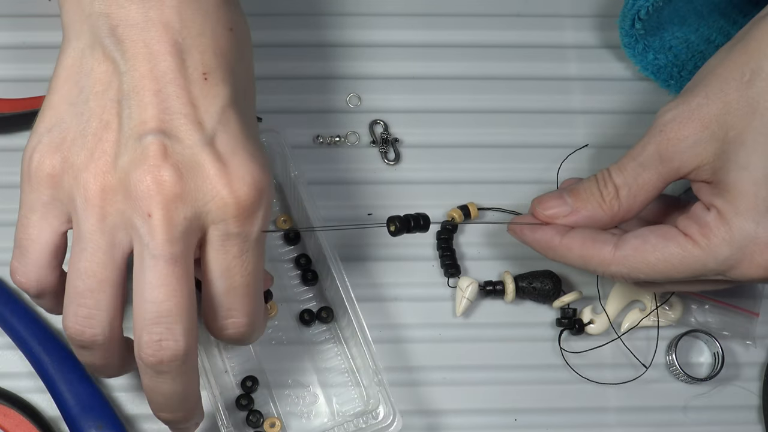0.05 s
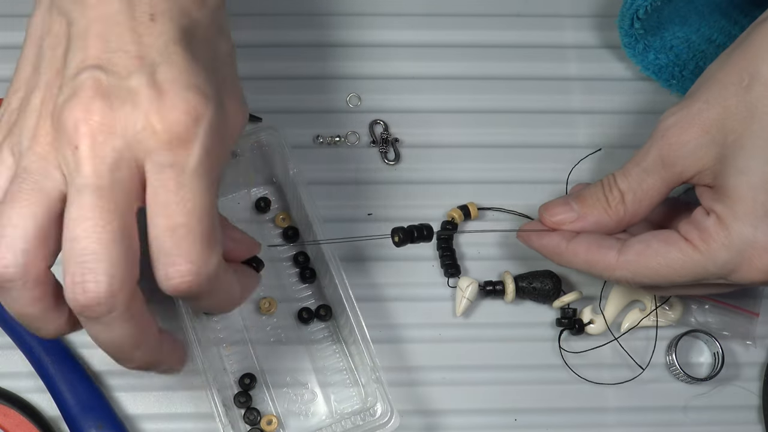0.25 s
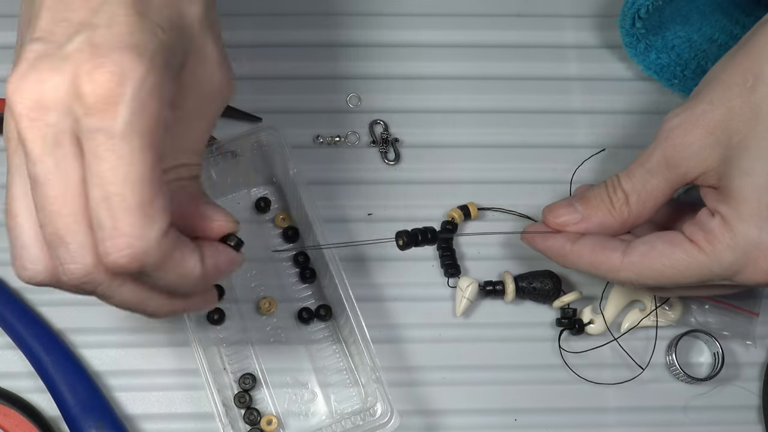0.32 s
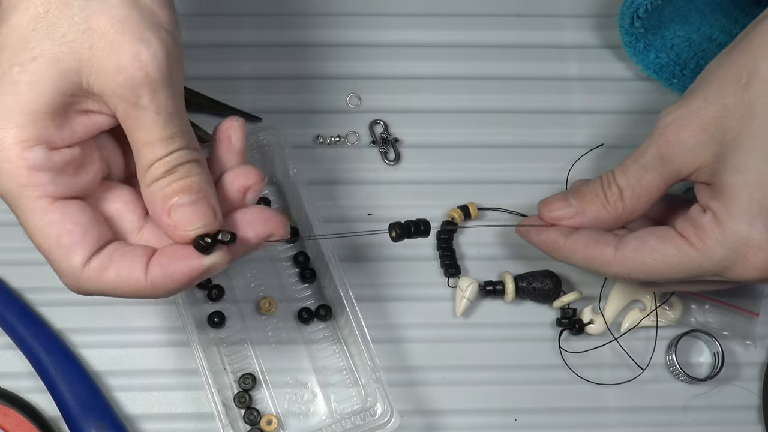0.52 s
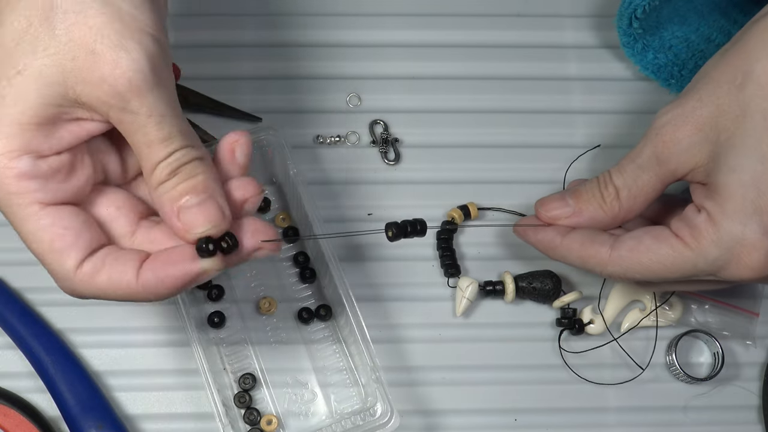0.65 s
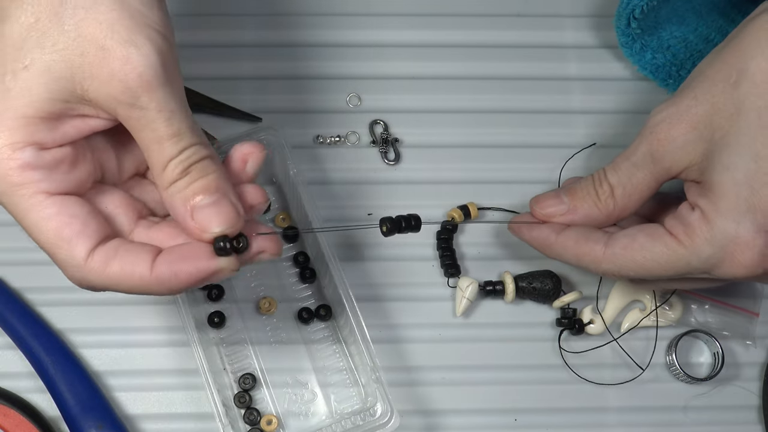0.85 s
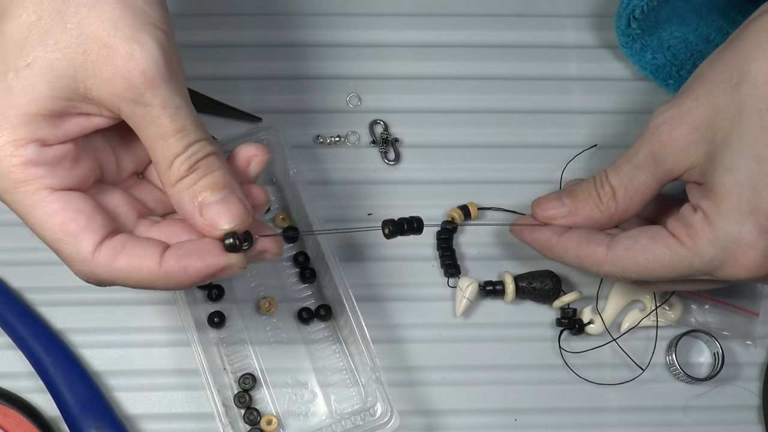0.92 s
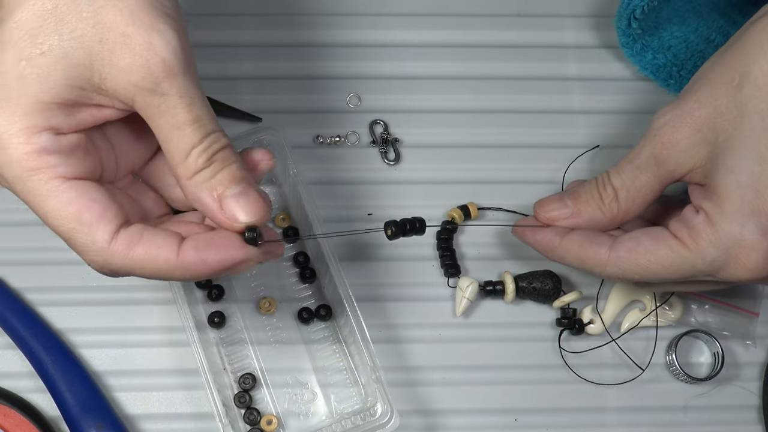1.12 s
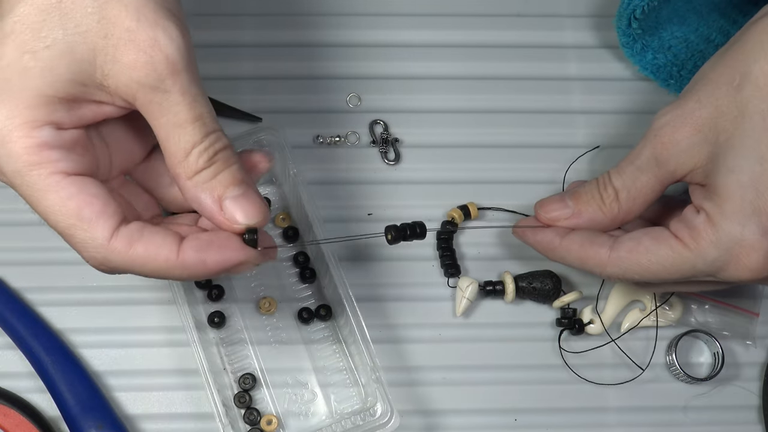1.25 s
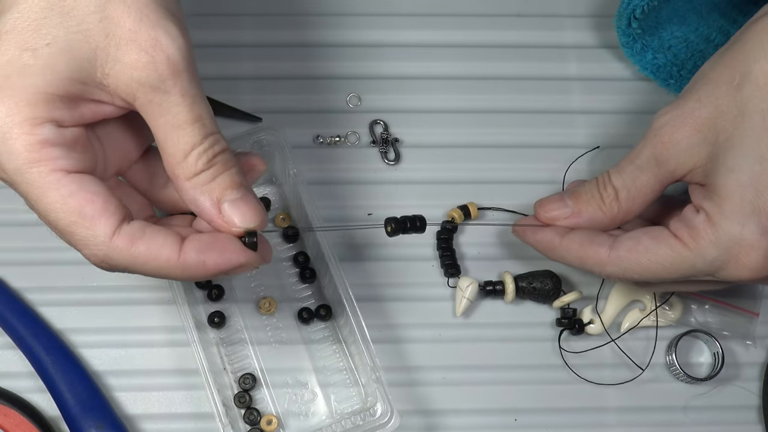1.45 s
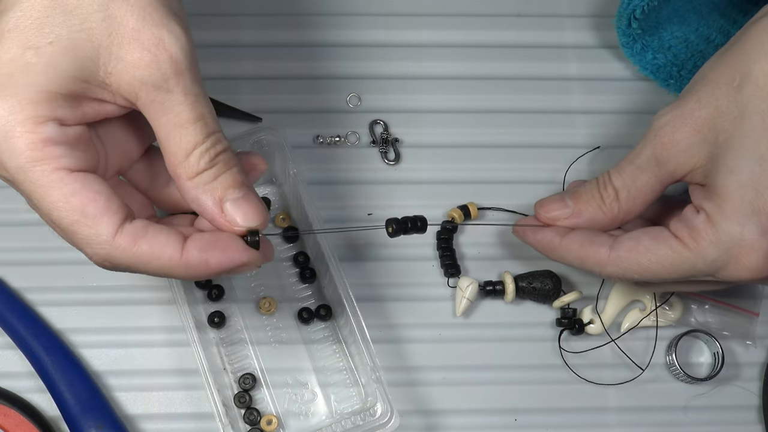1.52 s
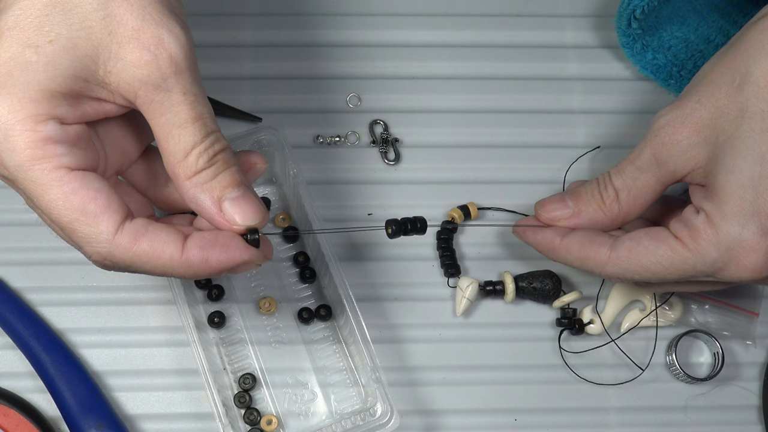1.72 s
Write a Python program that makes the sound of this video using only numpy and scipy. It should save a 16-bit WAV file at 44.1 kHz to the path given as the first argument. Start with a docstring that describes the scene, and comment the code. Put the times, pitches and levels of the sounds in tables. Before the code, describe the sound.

Small beads rattle in a thin plastic tray, one brief clatter, then quiet room air

```python
"""Fingers pick small wooden beads out of a thin plastic tray, close to a pair of microphones.
The tray knocks on the table and chatters with its beads: shaped noise bursts, ringing walls, low modes.
Light bead clicks come before and after as shorter noise bursts, over a crackle of tiny contacts.
Behind lies a small room: a short tail of decaying noise, steady coloured air noise,
and low resonances, wavering sines that swell and fade."""
import sys
import numpy as np
from scipy import signal
from scipy.fft import rfft, irfft, next_fast_len
from scipy.io import wavfile
from scipy.ndimage import map_coordinates

SR = 44100
rng = np.random.default_rng(int(sys.argv[2]) if len(sys.argv) > 2 else 0)


def wrap_up_sound(samples):
    """Save the sound to the file named by the first command line argument, as 16-bit audio."""
    columns = np.atleast_2d(samples).T
    # keep every value between -1 and 1, then stretch to whole-number steps
    tamed = np.clip(columns, -1, 1)
    steps = np.round(tamed * 32767).astype(np.int16)
    wavfile.write(sys.argv[1], SR, steps)


N = 79380  # samples, 1.8 s

# Tray knocking with its beads. Each row: start in seconds, relative level in dB, treble tilt in dB per octave.
TRAY_KNOCKS = [(0.2046, -23.5, 2), (0.2069, -22, -0.5), (.2105, -33, -4), (.2215, -38, 6),
               (0.2244, -31.5, -3.5), (.2316, -28, -1), (0.2343, -25.5, 3.5), (.2360, -24.5, -0.5),
               (.2398, -36, -2.5), (0.2496, -31.5, -4), (.2508, -33.5, -2.5), (.2540, -30, 0),
               (.2590, -36, -5), (0.2632, -33, 2), (.2665, -38, 3), (.2692, -31.5, -2), (.2750, -34, -1),
               (0.2772, -55, -4), (0.285, -43, 2)]
# Tray thumping on the table. Each row: start in seconds, relative level in dB.
TABLE_THUMPS = [(.2050, -33.5), (0.2323, -47)]
# Low modes of the tray. Each row: frequency in Hz, relative level in dB, 60 dB decay time in seconds.
TRAY_MODES = [(93, -18, 0.11), (170, -5.5, 0.2), (214, -5, 0.092), (263, -0.5, 0.14), (495, 5.5, 0.029),
              (657, 0, 0.038), (1184, 0.5, .05)]
# Ringing of the thin walls. Each row: frequency in Hz, relative level in dB, 60 dB decay time in seconds.
WALL_MODES = [(1397, -6, .13), (1854, -5, 0.13), (2385, -4, 0.087), (3380, -7, 0.12), (3870, -1.5, 0.08),
              (4180, 0, 0.11), (4390, 1, 0.071), (4736, -2, 0.052), (8600, -1, 0.051)]
# Spectrum of a tray knock, before tilt. Each row: frequency in Hz, relative level in dB.
KNOCK_SPECTRUM = [(150, -29), (300, -11.5), (520, -19), (850, -18), (1300, -10), (1850, -9), (2500, -10.5),
                  (3100, -5), (3600, -5.5), (4450, 1.5), (5200, -7), (7000, -9.5), (8700, -5.5),
                  (10000, -13), (12700, -14.5), (16000, -25)]
# Light bead clicks. Each row: start in seconds, relative level in dB, treble tilt in dB per octave.
BEAD_CLICKS = [(.002, -42, -0.5), (.0065, -40, -3.5), (0.028, -55, 2), (.0485, -53.5, 2.5),
               (0.0753, -54, -3), (.1045, -49, -2.5), (0.178, -49.5, 0), (.187, -47, -2), (0.1951, -44, -1),
               (0.3242, -42.5, -1), (.378, -44.5, 0), (0.3884, -33, 1.5), (0.4063, -31.5, 0),
               (.411, -36.5, -1.5), (0.415, -40.5, 3), (0.4183, -49, 0), (0.4317, -43, -0.5)]
# Spectrum of a bead click, before tilt. Each row: frequency in Hz, relative level in dB.
CLICK_SPECTRUM = [(300, -26), (700, -27), (1400, -4), (2100, -12.5), (2900, 2.5), (3500, -4.5), (4300, 1),
                  (5500, -1), (7000, -5), (12000, -9.5), (16000, -19)]
# Crackle of fingers shifting beads. Each row: time in seconds, level in dB.
SHUFFLE_LEVEL = [(0, -61), (.035, -51.5), (.07, -65.5), (.14, -68), (.18, -60), (.2, -52.5), (.28, -58),
                 (.305, -59), (.33, -54), (.355, -64), (.425, -52.5), (.45, -66), (.5, -85)]
# Decay of the room tail. Each row: frequency in Hz, 60 dB decay time in seconds.
ROOM_DECAY = [(200, 0.28), (2000, 0.42), (8000, 0.21), (16000, 0.19)]
# Difference between the two microphones. Each row: frequency in Hz, side level in dB.
SIDE_SPECTRUM = [(300, -16), (2000, -46), (4000, -18), (9000, -15.5), (15000, -13)]
# Room air, common to both microphones. Each row: frequency in Hz, relative level in dB.
AIR_SPECTRUM = [(25, -26.5), (60, -16.5), (120, -12), (150, -6), (180, -8), (230, -7), (300, -6), (450, -5),
                (550, -10), (640, -14), (720, -11), (860, -16.5), (1080, -11.5), (1350, -18.5),
                (1800, -21.5), (2100, -20), (2500, -24), (4000, -29), (14800, -33), (16000, -38)]
# Room air, opposite in the two microphones. Each row: frequency in Hz, relative level in dB.
AIR_SIDE_SPECTRUM = [(15, -66), (25, -27), (256, -6), (354, -8), (439, -8.5), (641, -21), (1040, -15.5),
                     (4490, -38), (6050, -19.5), (13600, -31.5), (16000, -45)]
# Stereo balance of the common air. Each row: frequency in Hz, left minus right in dB.
AIR_LEFT_RIGHT = [(60, -1.5), (120, 3), (240, -3.5), (480, -3.5), (950, -6), (1890, -1), (3770, 0.0),
                  (7520, -0.5), (15000, 0.0)]
# Swell of the lowest room resonance, before its waver. Each row: time in seconds, level in dB.
LOW_HUM_LEVEL = [(0, -65.5), (.13, -51.5), (.2, -59), (.29, -74), (.34, -58.5), (.4, -60), (.49, -47.5),
                 (.55, -66.5), (.8, -65), (1.2, -69.5), (1.29, -53), (1.37, -74), (1.57, -78), (1.64, -52),
                 (1.72, -62), (1.8, -60)]
# Swell of the next room resonance, before its waver. Each row: time in seconds, level in dB.
HIGH_HUM_LEVEL = [(0, -63.5), (.15, -57), (.39, -59), (.48, -65), (.58, -55.5), (.72, -63.5), (1.03, -77),
                  (1.12, -56), (1.22, -76), (1.48, -81), (1.55, -55), (1.69, -68), (1.77, -51), (1.8, -52)]
# Further room resonances. Each row: frequency in Hz, level before waver in dB, left minus right in dB.
ROOM_DRONES = [(259, -67.5, -4.5), (450.4, -67, -12.5)]

KNOCK_DB, WALLS_DB = 2, -23
KNOCK_ATTACK_S, KNOCK_T60_S, KNOCK_RING_DB, KNOCK_RING_T60_S = 0.00066, 0.013, -14, 0.096
CLICK_DB = 2.5
CLICK_ATTACK_S, CLICK_T60_S, CLICK_RING_DB, CLICK_RING_T60_S = 0.0003, 0.013, -20.5, 0.068
GRAINS_PER_S, GRAIN_SPREAD_DB, GRAIN_DECAY_S = 1500, 3, 0.00074
ROOM_DB, GLANCE_T60_S = -14, 0.015
AIR_DB, AIR_SIDE_DB = -56, -69.5
LOW_HUM_HZ, HIGH_HUM_HZ = 186.7, 221.5
LOW_HUM_PAN_DB, HIGH_HUM_PAN_DB = -1.5, 0.5  # left minus right
WAVER_POINTS_PER_S = 18
TOP_HZ = 16100


def tray():
    """The tray chatters as noise bursts with ringing walls, and thumps on the table in its low modes."""
    out = np.zeros(N)
    for start_s, db, tilt_db in TRAY_KNOCKS:
        crack = contact(KNOCK_SPECTRUM, tilt_db, KNOCK_ATTACK_S, KNOCK_T60_S,
                        KNOCK_RING_DB, KNOCK_RING_T60_S)
        walls = ring(WALL_MODES, spread_db=5.5)
        add(out, start_s, amp(db) * (amp(KNOCK_DB) * crack + amp(WALLS_DB) * walls))
    for start_s, db in TABLE_THUMPS:
        add(out, start_s, amp(db) * ring(TRAY_MODES, spread_db=3))
    return out


def beads():
    """Single beads click lightly; random tiny contacts crackle as the fingers shift them."""
    out = np.zeros(N)
    for start_s, db, tilt_db in BEAD_CLICKS:
        click = contact(CLICK_SPECTRUM, tilt_db, CLICK_ATTACK_S, CLICK_T60_S,
                        CLICK_RING_DB, CLICK_RING_T60_S)
        add(out, start_s, amp(db + CLICK_DB) * click)
    struck = rng.random(N) < GRAINS_PER_S / SR
    grains = struck * amp(GRAIN_SPREAD_DB * rng.standard_normal(N))
    # Each grain dies away exponentially
    envelope = signal.lfilter([1], [1, -np.exp(-1 / (GRAIN_DECAY_S * SR))], grains)
    crackle = unit(envelope * noise(KNOCK_SPECTRUM, tilt_db=-3.6))
    return out + level(SHUFFLE_LEVEL) * crackle


def contact(colour, tilt_db, attack_s, t60, ring_db, ring_t60):
    """One hard contact: noise for a burst of dense modes that dies fast and leaves a weak ring."""
    t = np.arange(SR // 4) / SR
    decay = amp(-60 * t / t60) + amp(ring_db - 60 * t / ring_t60)
    shape = decay * (1 - np.exp(-t / attack_s))
    burst = unit(noise(colour, tilt_db)[:len(t)] * shape)
    return burst * np.sqrt(np.mean(shape ** 2))


def ring(modes, spread_db):
    """Damped sine modes, each with a random phase and a slightly different level every strike."""
    t = np.arange(SR // 4) / SR
    tones = np.zeros(len(t))
    for hz, db, t60 in modes:
        decay = amp(db + spread_db * rng.standard_normal() - 60 * t / t60)
        tones += decay * np.sin(2 * np.pi * (hz * t + rng.random()))
    return tones * (1 - np.exp(-t / 0.0011))  # 1.1 ms attack


def room(x):
    """A short, weak room tail; reflections reach the two microphones a little differently."""
    hz, t, bands = signal.stft(rng.standard_normal(SR // 2), SR, nperseg=256)
    decay = amp(-60 * t / along(ROOM_DECAY, hz)[:, None])
    tail = signal.istft(bands * decay, SR, nperseg=256)[1]
    mid = x + amp(ROOM_DB) * signal.fftconvolve(x, tail / np.linalg.norm(tail))[:N]
    # Short glancing reflections, opposite in the two microphones
    t = np.arange(SR // 50) / SR
    glance = rng.standard_normal(len(t)) * amp(-60 * t / GLANCE_T60_S)
    glanced = signal.fftconvolve(mid, glance / np.linalg.norm(glance))[:N]
    side = filtered(glanced, lambda hz: amp(along(SIDE_SPECTRUM, hz)))
    return np.array([mid + side, mid - side])


def room_tone():
    """Steady coloured room noise, with low resonances that swell and waver."""
    air = filtered(amp(AIR_DB) * noise(AIR_SPECTRUM), lambda hz: pan(along(AIR_LEFT_RIGHT, hz)))
    air = air + amp(AIR_SIDE_DB) * noise(AIR_SIDE_SPECTRUM) * np.array([[1], [-1]])
    low_hum = level(LOW_HUM_LEVEL) * resonance(LOW_HUM_HZ, flutter=0.91)
    high_hum = level(HIGH_HUM_LEVEL) * resonance(HIGH_HUM_HZ, flutter=0.91)
    tone = air + pan(LOW_HUM_PAN_DB) * low_hum + pan(HIGH_HUM_PAN_DB) * high_hum
    for hz, db, left_right_db in ROOM_DRONES:
        tone = tone + pan(left_right_db) * amp(db) * resonance(hz, flutter=2.55)
    return tone


def resonance(hz, flutter):
    """A narrow room resonance: a sine whose phase (so pitch) and level (flutter, dB) wander at random."""
    points = np.arange(N) * WAVER_POINTS_PER_S / SR
    drift, sway = (map_coordinates(row, [points]) for row in rng.standard_normal((2, 256)))
    sine = np.sin(2 * np.pi * hz * np.arange(N) / SR + 1.14 * drift)  # drift in radians
    return amp(flutter * sway) * np.sqrt(2) * sine


def noise(colour, tilt_db=0):
    """Coloured noise of rms 1, with a treble tilt per octave above 300 Hz."""
    def response(hz):
        return amp(along(colour, hz) + tilt_db * np.log2(np.maximum(hz, 300)))
    return unit(filtered(rng.standard_normal(N), response))


def filtered(x, response):
    """Multiply the spectrum of x by a response of frequency, with zero padding."""
    m = next_fast_len(N + SR // 2)
    return irfft(rfft(x, m) * response(np.fft.rfftfreq(m, 1 / SR)), m)[..., :N]


def along(points, hz):
    """Interpolate (Hz, value) points on a log frequency axis."""
    f, v = np.transpose(points)
    return np.interp(np.log(hz + 1), np.log(f + 1), v)


def level(rows):
    """Gain per sample from (s, dB) points."""
    return amp(np.interp(np.arange(N) / SR, *np.transpose(rows)))


def pan(db):
    """Left and right gain for a level difference, left minus right."""
    return amp(np.array([[.5], [-.5]]) * db)


def amp(db):
    """Amplitude gain from dB."""
    return 10 ** (np.asarray(db) / 20)


def unit(x):
    """Scale to rms 1."""
    return x / np.sqrt(np.mean(x ** 2) + 1e-20)


def add(track, start_s, sound):
    """Mix a sound into the track at its start time."""
    start = max(0, round(start_s * SR))
    track[start:start + len(sound)] += sound[:N - start]


def scene():
    """Tray and beads close up in the small room, over its room tone."""
    return room(tray() + beads()) + room_tone()


def record(dry):
    """The recorder keeps nothing above its band limit."""
    return filtered(dry, lambda hz: hz < TOP_HZ)


dry = scene()
out = record(dry)
wrap_up_sound(out)
```